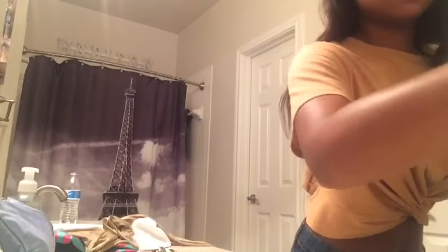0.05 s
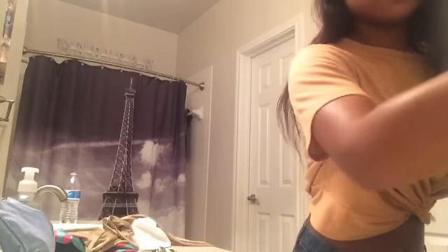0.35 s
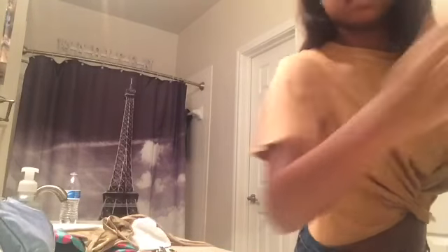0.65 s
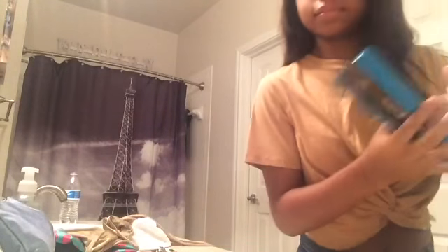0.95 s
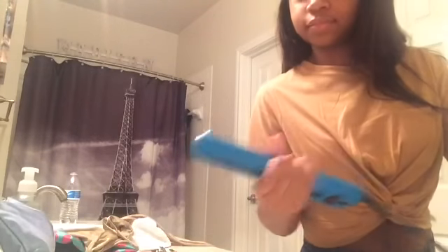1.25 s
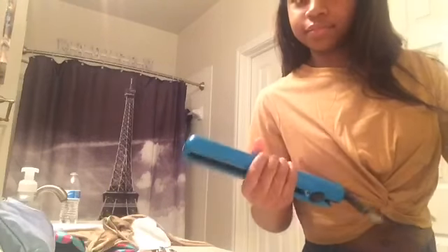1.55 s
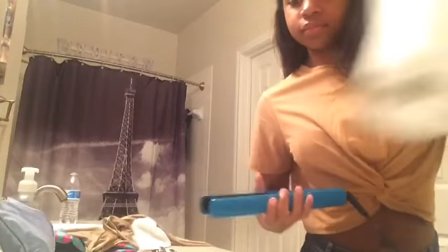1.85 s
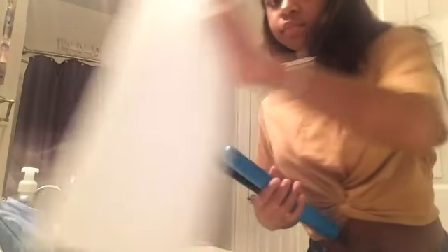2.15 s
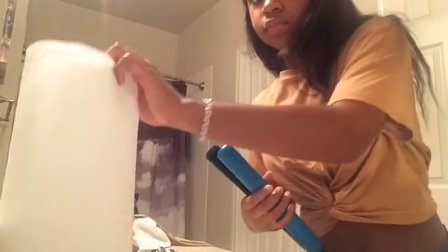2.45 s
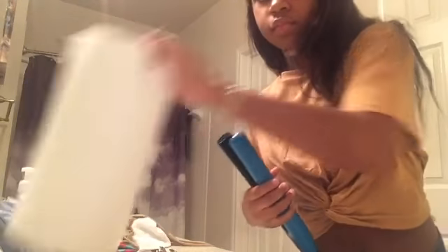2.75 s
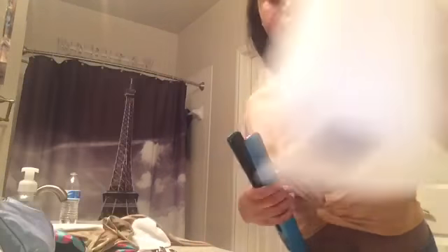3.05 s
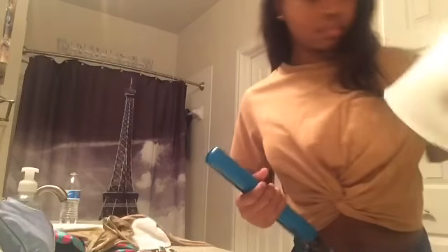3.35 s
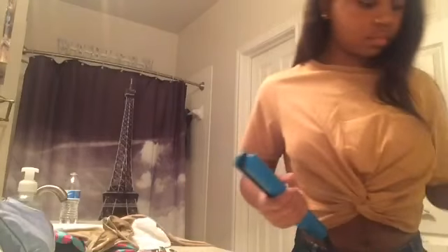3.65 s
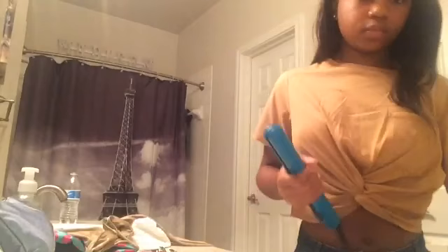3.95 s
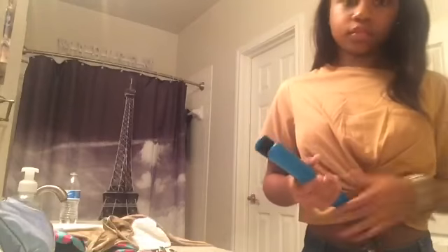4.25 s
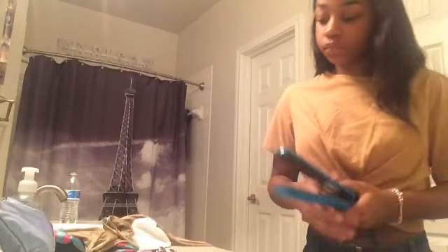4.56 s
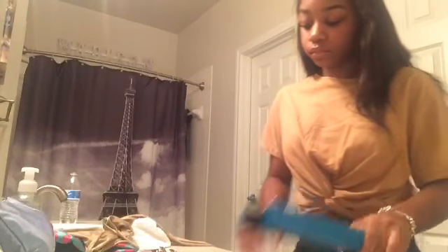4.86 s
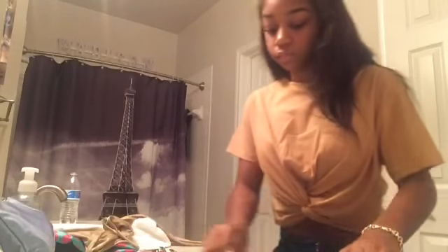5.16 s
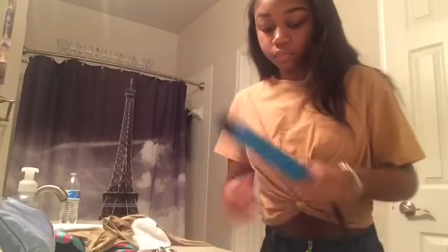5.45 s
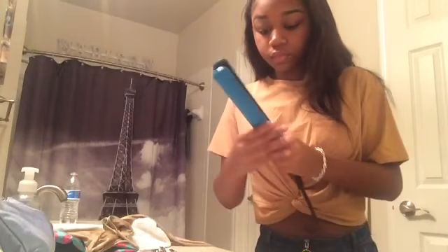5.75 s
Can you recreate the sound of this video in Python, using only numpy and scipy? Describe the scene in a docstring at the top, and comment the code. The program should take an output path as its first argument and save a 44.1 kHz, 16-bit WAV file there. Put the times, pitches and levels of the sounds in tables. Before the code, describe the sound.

Fumbling near the microphone, sharp snaps and ticks of a hair straightener, then a thud and a hard knock on a bathroom counter.

```python
"""Sharp clacks and light ticks of a hair straightener handled in a small tiled bathroom.
Its sprung plates snap shut, rebound and ring the casing; hinge and cord click; hands and cloth rub.
At first a hand fumbles and bumps at the microphone. Later a paper roll thuds on the counter, and a
hard knock rings the counter, followed by a grating slide. Ventilation hums faintly underneath."""
import sys
import numpy as np
from scipy import signal
from scipy.fft import rfft, irfft
from scipy.io import wavfile

SR = 44100
rng = np.random.default_rng(int(sys.argv[2]) if len(sys.argv) > 2 else 0)


def generate_wav(signal):
    """Clip the signal to [-1, 1] and save it as 16-bit WAV at the path in sys.argv[1]."""
    frames = np.transpose(np.atleast_2d(signal))
    scaled = np.clip(frames, -1, 1) * 32767
    pcm = np.round(scaled).astype(np.int16)
    wavfile.write(sys.argv[1], SR, pcm)


N = 259749

# plate closures: t/s, level/dB, treble/dB, casing ring/dB, rebound re first hit/dB, room/dB, ping f/Hz
CLACKS = [(0.3834, -26, 2.5, -7.5, -0.5, -7.5, 7850), (1.3115, -11.5, 1, -2, -11.5, -3, 3630),
          (1.5265, -15.5, 5, -6, -15, -2.5, 6980), (3.3316, -16, 3.5, -9.5, -3.5, -1.5, 5224),
          (4.0132, -16.5, 4, -9.5, -17, 0.5, 2960)]
# plate contact spectrum: f/Hz, gain/dB
CLACK_COLOUR = [(60, -20), (250, -9), (480, -0.5), (700, -6), (900, -3.5), (1500, -1), (2700, -4),
                (3400, -3), (4500, -8.5), (7500, -5.5), (10000, -9), (15000, -10)]


def plates(rebound_s=0.0072, ping_db=-11.5, ping_t60_s=0.04):
    """The sprung arms meet twice; the plates ping at a pitch set by where they touch."""
    out = np.zeros(N)
    for s, db, treble_db, ring_db, rebound_db, room_db, ping_hz in CLACKS:
        for at_s, level_db in (s, db), (s + rebound_s, db + rebound_db):
            clack = unit_rms(snap(CLACK_COLOUR, treble_db, ring_db, room_db, chatter=3.1, detune=0.0064))
            ping = ring([(ping_hz, 0, ping_t60_s)], detune=0, size=len(clack))
            clack += gain_of(ping_db) * unit_rms(ping)
            add(out, at_s, gain_of(level_db) * with_energy(clack, equivalent_s=0.0097))
    return out


# straightener body modes: f/Hz, level/dB, t60/s
CASING_MODES = [(848, 0, .06), (995, -5, 0.063), (1276, -2.5, 0.11), (1450, 1, 0.073), (1520, -4.5, 0.051),
                (1760, -3, 0.069), (2040, -5.5, 0.076), (2380, -4.5, 0.076), (3000, -10.5, 0.087),
                (3750, -9, 0.048), (5336, -7.5, 0.024), (6910, -6.5, .02), (8000, -4.5, .025),
                (11400, -11, 0.06)]


def snap(colour, treble_db, ring_db, room_db, chatter, detune, size=14000):
    """A contact rings the casing; the room gathers sound from all sides, so its share is smoother."""
    casing = np.zeros(size)
    add(casing, 0, ring(CASING_MODES, detune, treble_db, size=5000))
    casing = gain_of(ring_db) * unit_rms(casing)
    rough = contact(chatter, chatter_s=0.0017, size=size)
    smooth = contact(chatter=0.67, chatter_s=0.002004, size=size)
    direct = unit_rms(coloured(rough, colour, treble_db)) + casing
    diffuse = unit_rms(coloured(smooth, colour, treble_db)) + casing
    return unit_rms(direct) + gain_of(room_db) * bathroom(unit_rms(diffuse))


# hinge, casing and cord clicks: t/s, level/dB, treble/dB, room/dB
TICKS = [(0.024, -30.5, -20, -7), (0.083, -21, -26.5, 5), (0.175, -29, -18, -8), (0.325, -26, -14.5, 3.5),
         (0.516, -29, -28, -3), (0.596, -27, -30, 8), (0.646, -22, -17, 0), (0.679, -28, -1, -3.5),
         (0.778, -22, -4.5, 2), (0.801, -24.5, 3, -6), (0.827, -25.5, -18, -9), (0.921, -31, -12.5, 0),
         (0.961, -19.5, -19, -1), (1.069, -23, -22, -0.5), (1.302, -15.5, -17.5, 0.5),
         (1.428, -12.5, -15, -2), (1.473, -22, -16, -2), (1.520, -18, -14, -1), (1.635, -15.5, -17, 0.5),
         (1.72, -17, -18.5, -4.5), (1.816, -17.5, -21.5, -6), (2.048, -27, -26.5, -6),
         (2.162, -12.5, -30.5, -7.5), (2.392, -23, -18.5, -10.5), (2.818, -41.5, -7, 1.5),
         (2.94, -37.5, -34, -8), (3.027, -34.5, -28, 2), (3.166, -39.5, -37, -4), (3.504, -20.5, -20, -3),
         (4.239, -19, -18.5, -0.5), (4.424, -34, -20, -2), (4.834, -38.5, -21, -5), (4.982, -23, -31.5, 0),
         (5.015, -26, -40, -10), (5.078, -11, -18, -1), (5.486, -24.5, -32, -4), (5.573, -30, -26, 3),
         (5.729, -40, -21, -4), (5.857, -38, -20, -5)]
# plastic contact spectrum: f/Hz, gain/dB
TICK_COLOUR = [(60, -18), (300, -9.5), (650, -7.5), (900, -3), (1450, -1.5), (2000, -4.5), (2600, -7.5),
               (3200, -6.5), (5300, -6), (7500, -2.5), (10000, -6.5), (15000, -8.5)]


def hinge():
    """Light plastic contacts click and ring the hollow casing."""
    out = np.zeros(N)
    for s, db, treble_db, room_db in TICKS:
        tick = snap(TICK_COLOUR, treble_db, ring_db=-10, room_db=room_db, chatter=1.8, detune=0.021)
        add(out, s, gain_of(db) * with_energy(tick, equivalent_s=0.00069))
    return out


# three dull bumps of a hand at the microphone, then thuds and knocks on the counter:
# t/s, ring level/dB, roll-off f/Hz (higher is harder), crack level/dB
KNOCKS = [(0.177, -45, 900, -37.5), (0.38, -25, 200, -51), (0.596, -34, 970, -31.5), (1.293, -35, 180, -39),
          (2.390, -13, 149, -24.5), (2.414, -29, 130, -49), (2.466, -34, 400, -51.5),
          (4.617, -54.5, 785, -40.5), (4.643, -59, 700, -49), (5.077, -12, 9000, -13.5),
          (5.089, -24, 4000, -27.5), (5.112, -21.5, 600, -30.5), (5.485, -51, 700, -39.5)]
# crack spectrum: f/Hz, gain/dB
KNOCK_COLOUR = [(30, -22), (150, 1.5), (300, 10.5), (500, 7.5), (750, 6), (1100, -4.5), (1800, -1.5),
                (2500, -3.5), (3150, -1.5), (4300, -5.5), (5500, -12), (8000, -13), (11000, -24.5),
                (15000, -21.5)]
# modes of the counter and what stands on it, also used for the hand bumps: f/Hz, level/dB, t60/s
KNOCK_MODES = [(61, -18.5, 0.4), (96.7, 6, 0.12), (106.1, 10, .09), (153.6, 0, 0.35), (200.7, 0, 0.35),
               (220.8, -10, 0.48), (285, -8, 0.47), (315.4, -3.5, 0.32), (394, -11.5, 0.36),
               (440, -15, 0.29), (470, -21, .25), (533, -20, 0.25), (646, -18, .25), (807, -19, 0.58),
               (1060, -26, 0.28), (1279, -20, .35), (2370, -17.5, .25), (3105, -8, 0.13), (3180, -8, .23),
               (3930, -26, .2)]


def bumps_and_knocks():
    """Hand bumps at the microphone, then blows on the counter; harder contacts ring higher modes."""
    booms, cracks = np.zeros(N), np.zeros(N)
    for s, ring_db, rolloff_hz, crack_db in KNOCKS:
        force = contact(chatter=1.2, chatter_s=0.001915)
        crack = coloured(force, KNOCK_COLOUR, rolloff_hz=rolloff_hz)
        boom = ring(KNOCK_MODES, detune=0.00067, rolloff_hz=rolloff_hz)
        add(cracks, s, gain_of(crack_db) * with_energy(crack, equivalent_s=0.0068))
        add(booms, s, gain_of(ring_db) * with_energy(boom, equivalent_s=0.019))
    return booms + gain_of(-10.5) * bathroom(booms) + cracks + gain_of(-1) * bathroom(cracks)


# pushes across the counter: t/s, length/s, level/dB
DRAGS = [(4.95, 0.091, -43.5), (5.17, 0.14, -34), (5.345, 0.14, -39), (5.61, 0.12, -47.5)]
# sliding resonances: f/Hz, width/Hz, level/dB
SLIDE_MODES = [(900, 89, -14), (1070, 170, -7), (1480, 250, -5), (1860, 130, -3.5), (2300, 200, -6)]
# grating spectrum: f/Hz, gain/dB
GRIT_COLOUR = [(100, -11), (350, 1), (700, 3.5), (1200, 2.5), (2000, -2.5), (3000, -10.5), (4500, -19),
               (8000, -30), (15000, -38)]
# squeak partials: f/Hz, width/Hz, level/dB
SQUEAK_MODES = [(5700, 260, 0), (7800, 300, -2), (10000, 600, -9), (11900, 900, -4)]


def dragging(squeak_at_s=5.36, squeak_length_s=0.077, squeak_db=-57):
    """Uneven slips on the counter grate and drive hollow resonances, with one faint squeak."""
    slips = friction(slips_per_s=400, spread_db=3.5, hiss=0.4) * hand_pressure(depth_db=2.5, per_s=67)
    grit = gain_of(11) * unit_rms(coloured(slips, GRIT_COLOUR))
    scrape = resonances(slips, SLIDE_MODES) + grit
    squeak = unit_rms(resonances(rng.standard_normal(N), SQUEAK_MODES))
    shape = dict(attack_s=0.027, release_s=0.049, sag_db=0.5)
    squeak *= gestures([(squeak_at_s, squeak_length_s, squeak_db)], **shape)
    return unit_rms(scrape + bathroom(scrape)) * gestures(DRAGS, **shape) + squeak


# grip shifts: t/s, length/s, rumble level/dB, hollow rub level before trim/dB
FUMBLES = [(0.0, 0.018, -36, -42.5), (0.167, .04, -38, -32), (0.245, 0.046, -33, -35.5),
           (0.319, 0.053, -28, -39.5), (0.374, .025, -25, -39), (0.505, 0.065, -34, -42.5),
           (0.595, 0.042, -40, -35)]
# low handling resonances: f/Hz, width/Hz, level/dB
RUMBLE_MODES = [(109.5, 22, -5), (150.6, 10.4, -4), (213, 25, 0.5), (264, 37.4, -11)]
# mid handling resonances: f/Hz, width/Hz, level/dB
HOLLOW_MODES = [(423, 94, -2.5), (522, 63, 5), (750, 180, 3), (1105, 120, -4.5)]


def fumbling(hollow_trim_db=-2.5):
    """A hand shifts its grip beside the microphone: a dull rumble and a hollow rub."""
    rumble = resonances(friction(slips_per_s=200, spread_db=3.5, hiss=0.7), RUMBLE_MODES)
    hollow = resonances(friction(slips_per_s=220, spread_db=2.5, hiss=0.71), HOLLOW_MODES)
    s, length_s, rumble_db, hollow_db = np.transpose(FUMBLES)
    shape = dict(attack_s=0.0077, release_s=0.04, sag_db=3)
    rumble = unit_rms(rumble) * gestures(zip(s, length_s, rumble_db), **shape)
    hollow = unit_rms(hollow) * gestures(zip(s, length_s, hollow_db + hollow_trim_db), **shape)
    return rumble + hollow


# hand, cloth and cord strokes: t/s, length/s, rub level/dB, swish level/dB
STROKES = [(0.0, 0.25, -43.5, -59), (0.395, 0.088, -47, -68), (0.766, .12, -50, -59),
           (1.072, 0.3, -49.5, -65.5), (1.238, 0.074, -46.5, -58), (2.011, 0.062, -46, -66.5),
           (2.197, 0.19, -51.5, -59.5), (2.553, 0.11, -60.5, -63.5), (2.913, 0.19, -49, -84),
           (3.23, .08, -58, -85), (4.38, .12, -58, -74), (4.807, 0.16, -50, -75)]
# dull rub spectrum: f/Hz, gain/dB
RUB_COLOUR = [(100, -5), (350, 8), (700, 5), (1200, 2.5), (2000, -2.5), (3000, -8.5), (4500, -32.5),
              (8000, -45.5), (15000, -43.5)]
# bright swish spectrum: f/Hz, gain/dB
SWISH_COLOUR = [(500, -33), (2500, 0.5), (4000, 4), (7500, 0.5), (10000, -6), (15000, -4)]


def hands():
    """Friction of hands, cloth and cord rubs and swishes through the room."""
    rub = coloured(friction(slips_per_s=300, spread_db=4.5, hiss=0.94), RUB_COLOUR)
    rub *= hand_pressure(depth_db=6, per_s=60)
    swish = coloured(friction(slips_per_s=670, spread_db=8.5, hiss=0.53), SWISH_COLOUR)
    s, length_s, rub_db, swish_db = np.transpose(STROKES)
    shape = dict(attack_s=0.01, release_s=0.054, sag_db=1.5)
    rub = unit_rms(rub + bathroom(rub)) * gestures(zip(s, length_s, rub_db), **shape)
    swish = unit_rms(swish + bathroom(swish)) * gestures(zip(s, length_s, swish_db), **shape)
    return rub + swish


# hum bands: f/Hz, width/Hz, level/dB
HUM_BANDS = [(122.8, 7.3, -52), (206, 42, -58.5), (292.9, 11, -64.5), (520.7, 6.6, -71)]
# air rush spectrum: f/Hz, gain/dB
AIR_COLOUR = [(15, -46.5), (25, -15.5), (69, -7), (101, -6.5), (128, -1.5), (181, -7.5), (529, -17.5),
              (749, -21.5), (1090, -19), (1960, -26), (3440, -34), (10600, -41), (15000, -42)]


def ventilation(air_db=-53):
    """Narrow noise bands make a wavering low hum in a soft rush of air."""
    air = gain_of(air_db) * unit_rms(coloured(rng.standard_normal(N), AIR_COLOUR))
    return air + resonances(rng.standard_normal(N), HUM_BANDS)


# tiled room decay: f/Hz, t60/s
ROOM_T60 = [(100, 0.57), (300, 0.36), (700, 0.29), (1700, 0.37), (4600, 0.27), (8000, 0.32), (15000, 0.18)]


def bathroom(x, size=20000, delay_s=0.002, onset_s=0.00074):
    """Dense reflections from close hard walls, each band dying at its own speed."""
    size = min(size, len(x))
    reflections = rng.standard_normal(size) * (rng.random(size) < 0.2)
    hz, t, bands = signal.stft(reflections, SR, nperseg=256)
    decay = gain_of(-60 * t / curve_at(ROOM_T60, hz)[:, None])
    tail = signal.istft(bands * decay, SR, nperseg=256)[1]
    tail *= np.clip((np.arange(len(tail)) / SR - delay_s) / onset_s, 0, 1)
    return signal.oaconvolve(x, tail / np.linalg.norm(tail))[:len(x)]


def contact(chatter, chatter_s, size=22050):
    """One push, and a brief chatter of the two surfaces that swells and dies."""
    age = np.arange(size) / SR / chatter_s
    force = rng.standard_normal(size) * np.sqrt(age) * np.exp(-age)
    force *= chatter / np.linalg.norm(force)
    force[round(SR * chatter_s / 2)] += 1
    return force


def ring(modes, detune, treble_db=0, rolloff_hz=SR, size=22050):
    """Dying modes; a soft contact misses the high ones, and the grip detunes them a little."""
    t = np.arange(size) / SR
    hz, db, t60_s = np.transpose(modes)[:, :, None]
    hz = hz * (1 + detune * rng.standard_normal(hz.shape))
    polarity = (-1) ** np.arange(len(hz))[:, None]  # neighbouring modes swing opposite ways
    amplitude = polarity * gain_of(db + treble_db * shelf(hz)) / (1 + (hz / rolloff_hz) ** 2)
    decay = np.exp(-np.log(1000) * t / t60_s)
    return (amplitude * decay * np.sin(2 * np.pi * hz * t)).sum(0)


def friction(slips_per_s, spread_db, hiss):
    """Tiny slips of uneven size over a smooth hiss."""
    slips = (rng.random(N) < slips_per_s / SR) * rng.standard_normal(N)
    slips *= gain_of(spread_db * np.minimum(rng.exponential(1, N), 3))
    return unit_rms(slips) + hiss * rng.standard_normal(N)


def hand_pressure(depth_db, per_s):
    """Gain that wanders with the pressure of a hand."""
    t = np.arange(N) / SR
    return gain_of(depth_db * np.interp(t * per_s, np.arange(1000), rng.standard_normal(1000)))


def gestures(rows, attack_s, release_s, sag_db):
    """Gain of movements (t/s, length/s, level/dB): each swells, eases off and dies away."""
    t, power = np.arange(N) / SR, np.zeros(N)
    for s, length_s, db in rows:
        swell = np.clip((t - s) / attack_s, 0, 1)
        hold = gain_of(db - sag_db * np.clip((t - s) / length_s, 0, 1))
        release = np.exp(-np.maximum(t - s - length_s, 0) / release_s)
        power += (swell * hold * release) ** 2
    return np.sqrt(power)


def resonances(x, modes, size=2 ** 18):
    """Drives steep resonances, each to its own rms level."""
    hz, spectrum = np.fft.rfftfreq(size, 1 / SR), rfft(x, size)
    out = np.zeros(N)
    for centre_hz, width_hz, db in modes:
        band = spectrum / (1 + 1j * (hz - centre_hz) / width_hz) ** 2
        out += gain_of(db) * unit_rms(irfft(band)[:N])
    return out


def coloured(x, colour, treble_db=0, rolloff_hz=SR, size=4096):
    """Minimum-phase filter: a colour, a treble shelf and the roll-off of a soft contact."""
    hz = abs(np.fft.fftfreq(size, 1 / SR))
    gain = gain_of(curve_at(colour, hz) + treble_db * shelf(hz)) / np.hypot(1, hz / rolloff_hz)
    response = np.exp(np.conj(signal.hilbert(np.log(gain))))
    taps = np.fft.ifft(response).real[:size // 2]
    return signal.oaconvolve(x, taps)[:len(x)]


def shelf(hz):
    """0 below 2 kHz, 1 above 6 kHz."""
    return np.clip(np.log((hz + 1) / 2000) / np.log(3), 0, 1)


def curve_at(points, hz):
    """Interpolates a table over log frequency."""
    points_hz, values = np.transpose(points)
    return np.interp(np.log(hz + 1), np.log(points_hz + 1), values)


def gain_of(db):
    """Decibels to amplitude."""
    return 10 ** (np.asarray(db) / 20)


def unit_rms(x):
    """Scales to rms 1."""
    return x / np.sqrt(np.mean(x ** 2) + 1e-20)


def with_energy(sound, equivalent_s):
    """Scales to the energy of a unit signal lasting equivalent_s."""
    return sound * np.sqrt(equivalent_s * SR) / np.linalg.norm(sound)


def add(mix, at_s, sound):
    """Lays a sound into the mix."""
    part = mix[max(round(at_s * SR), 0):][:len(sound)]
    part += sound[:len(part)]


def scene():
    """All sources in one channel."""
    impacts = plates() + hinge() + bumps_and_knocks()
    return (impacts + dragging() + fumbling() + hands() + ventilation())[None]


def record(dry, cutoff_hz=15600):
    """Clips at full scale, then limits the band."""
    lowpass = signal.firwin(511, cutoff_hz, window=("kaiser", 9), fs=SR)
    return signal.oaconvolve(np.clip(dry, -1, 1), lowpass[None], "same")


dry = scene()
out = record(dry)
generate_wav(out)
```